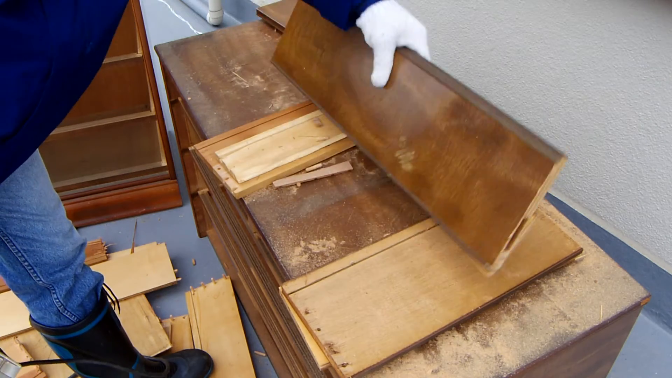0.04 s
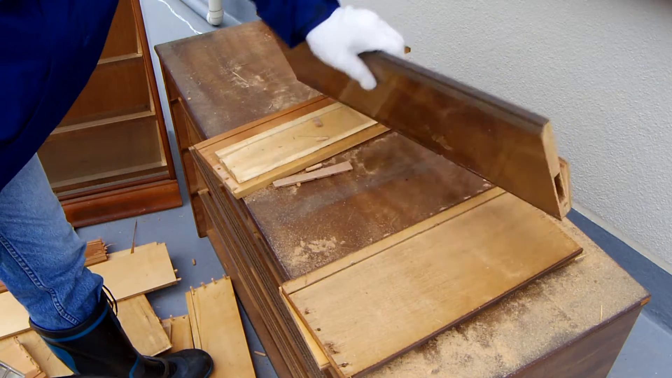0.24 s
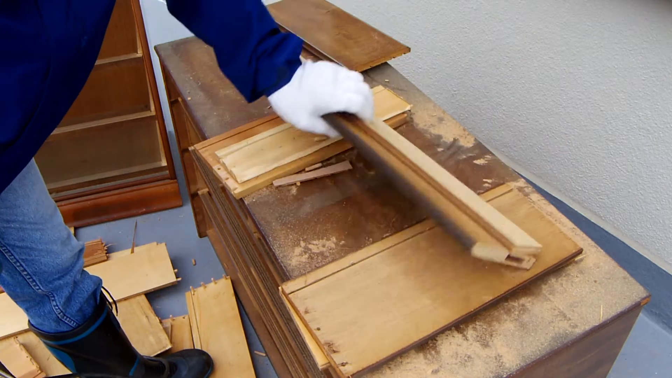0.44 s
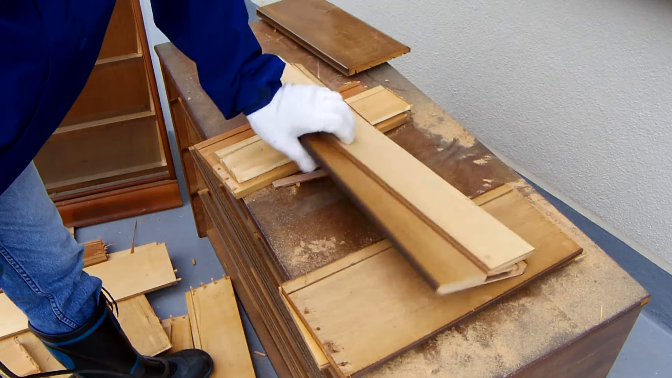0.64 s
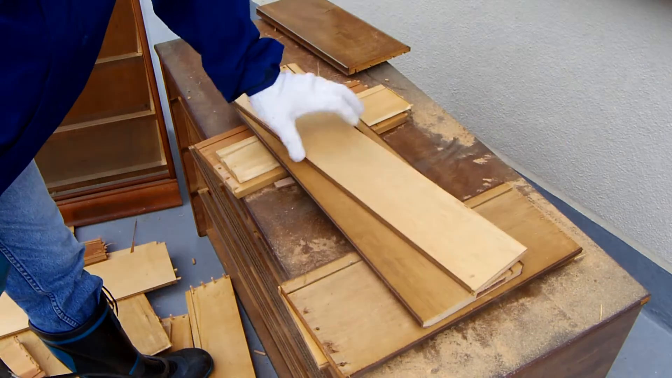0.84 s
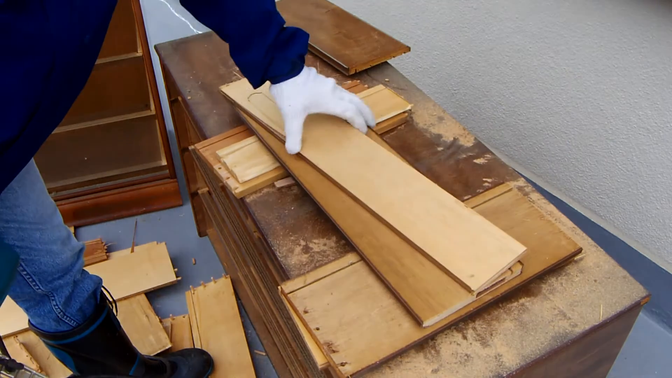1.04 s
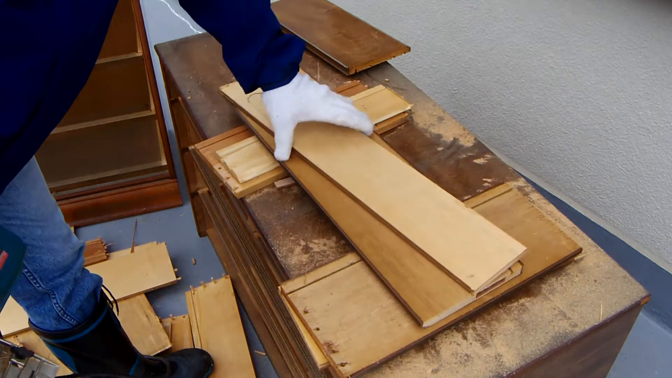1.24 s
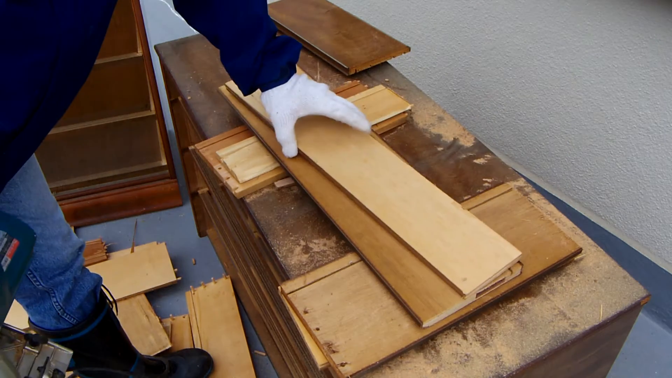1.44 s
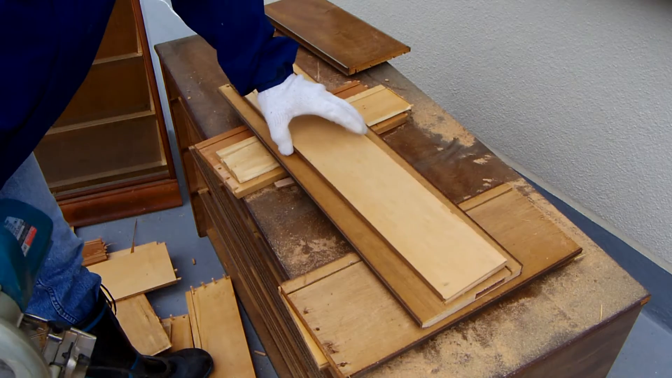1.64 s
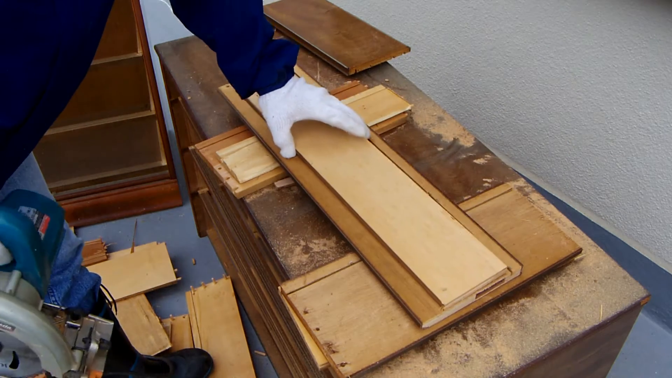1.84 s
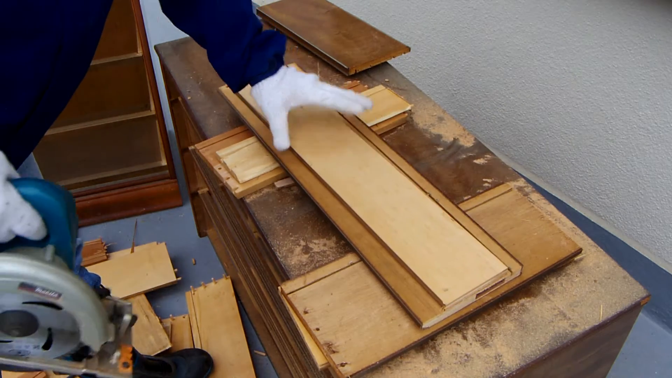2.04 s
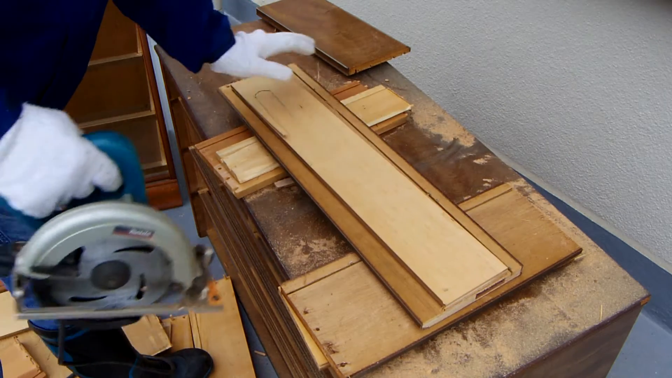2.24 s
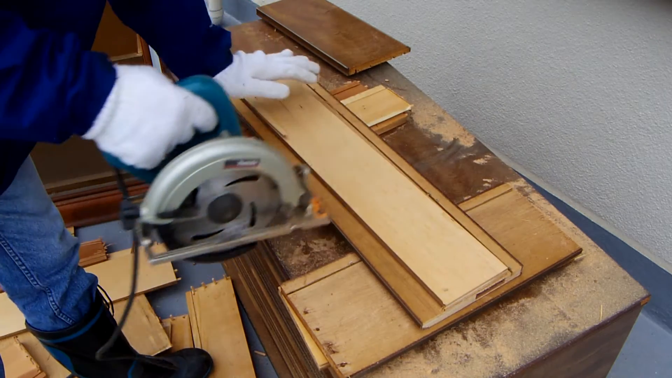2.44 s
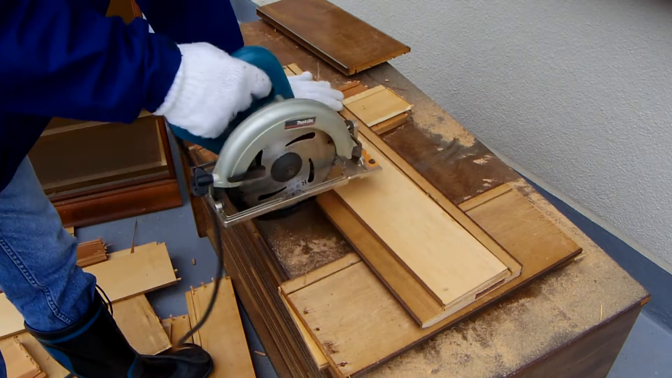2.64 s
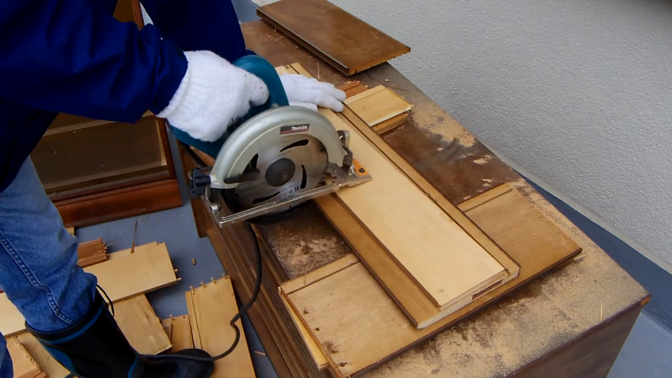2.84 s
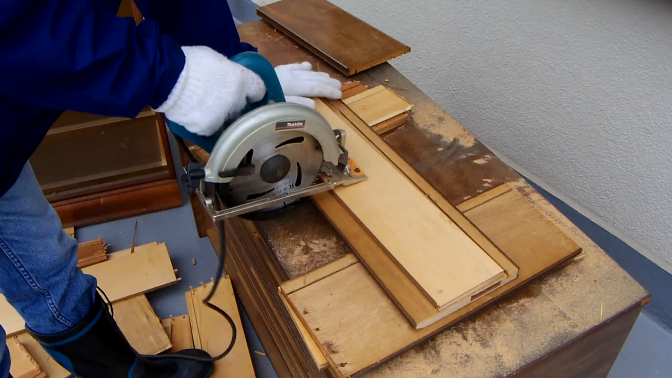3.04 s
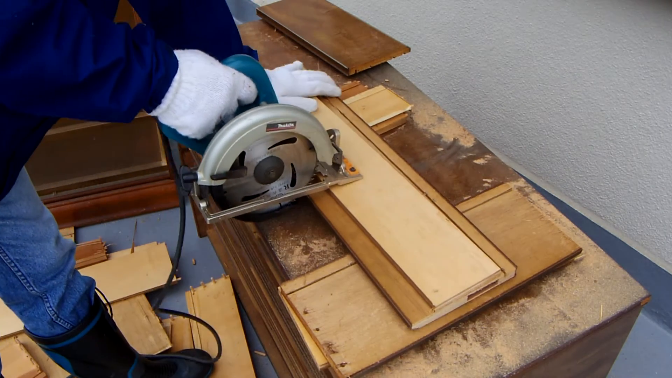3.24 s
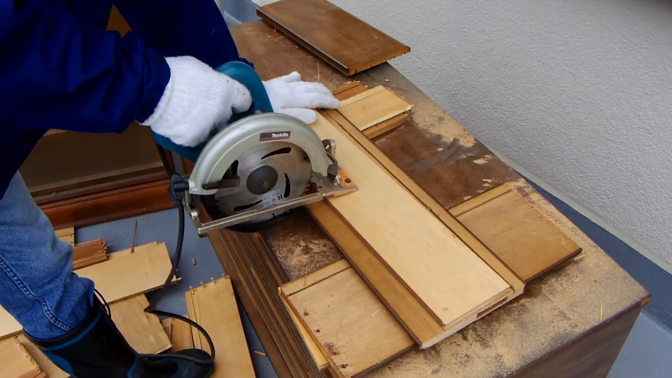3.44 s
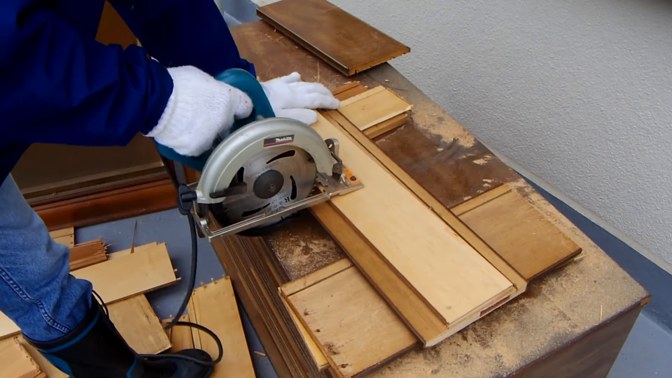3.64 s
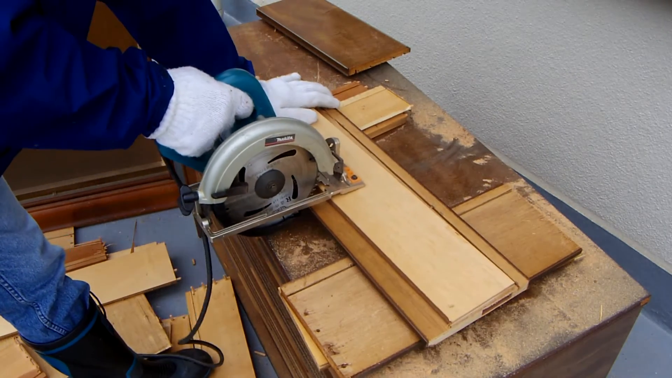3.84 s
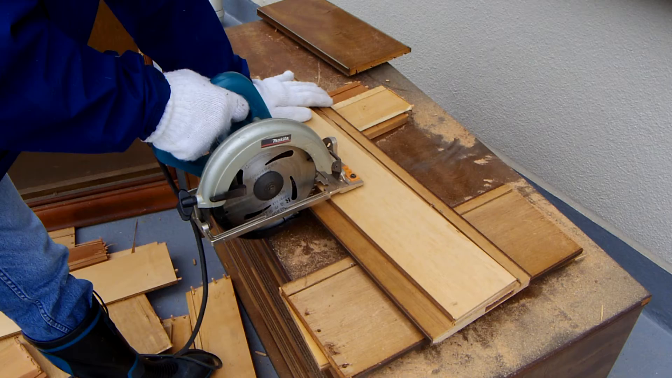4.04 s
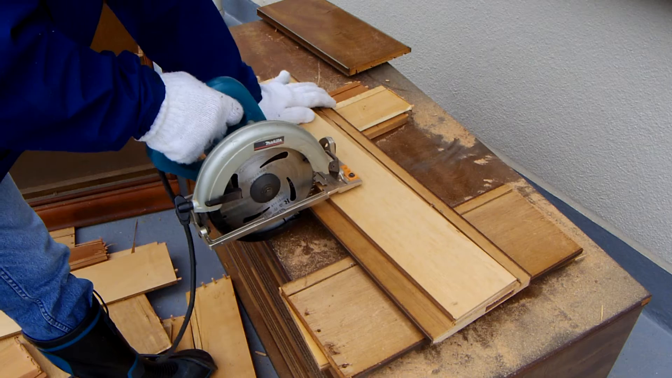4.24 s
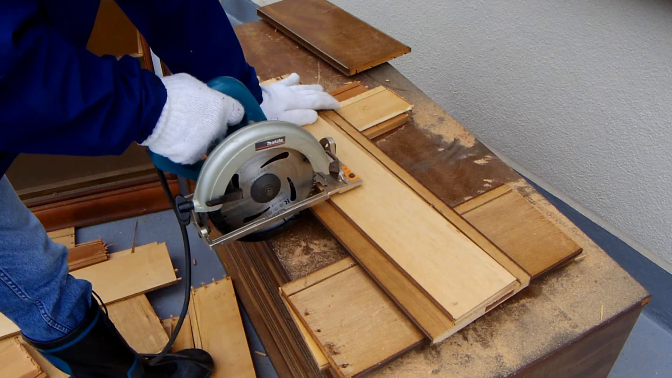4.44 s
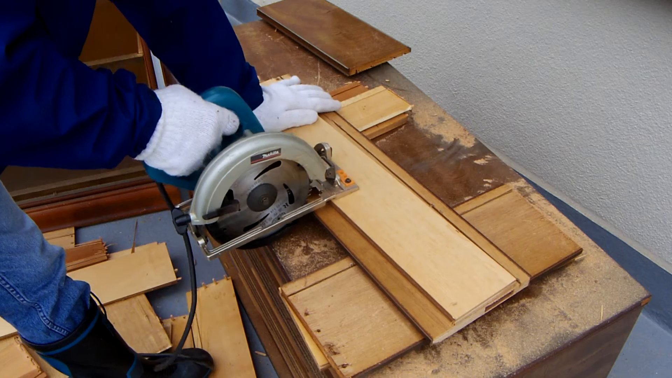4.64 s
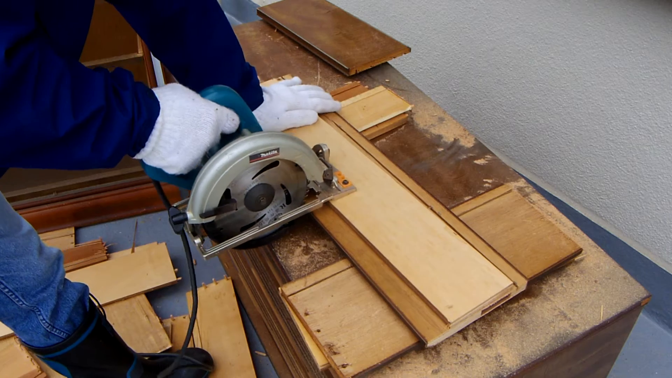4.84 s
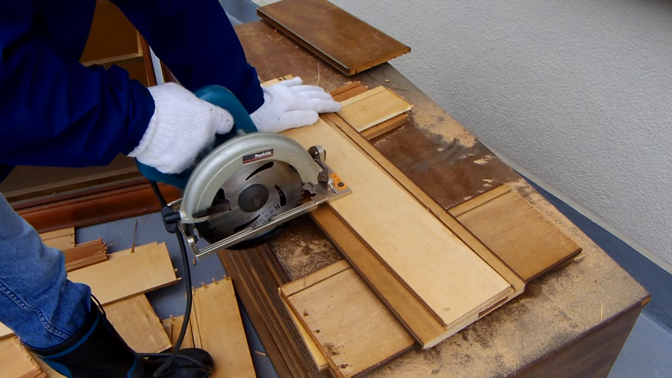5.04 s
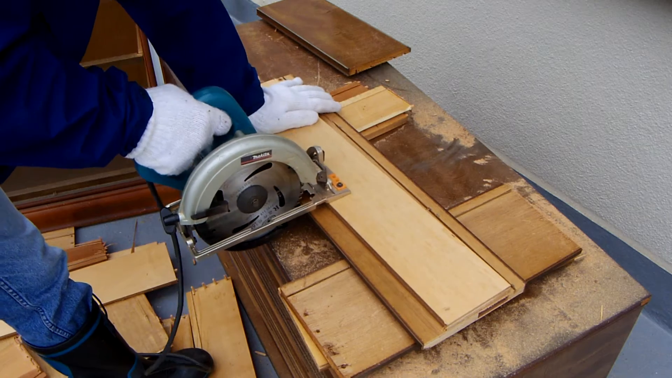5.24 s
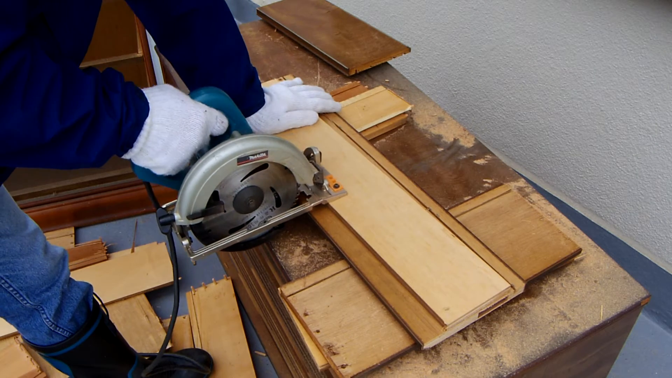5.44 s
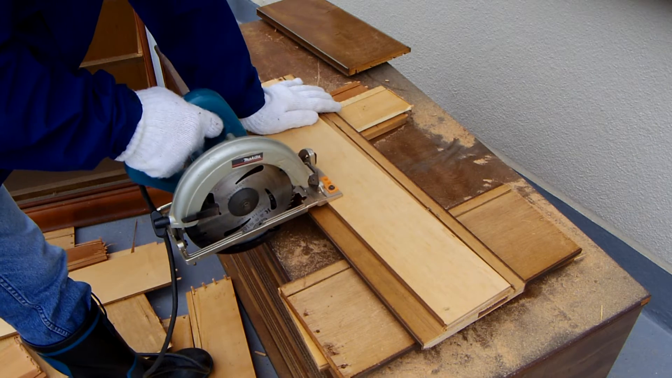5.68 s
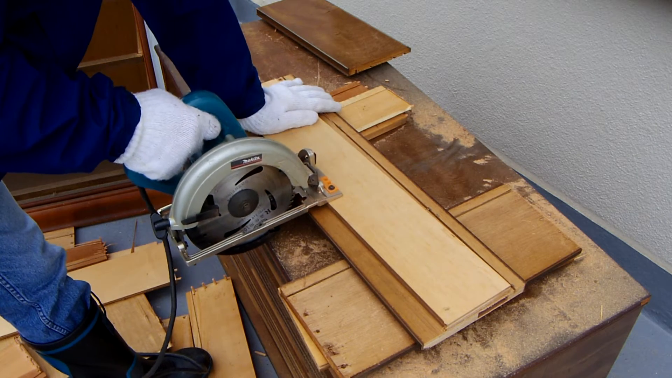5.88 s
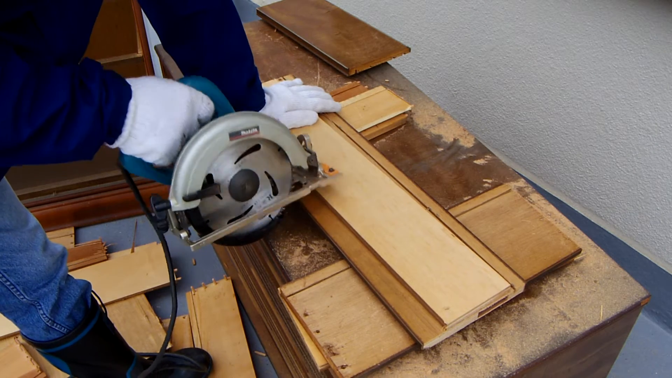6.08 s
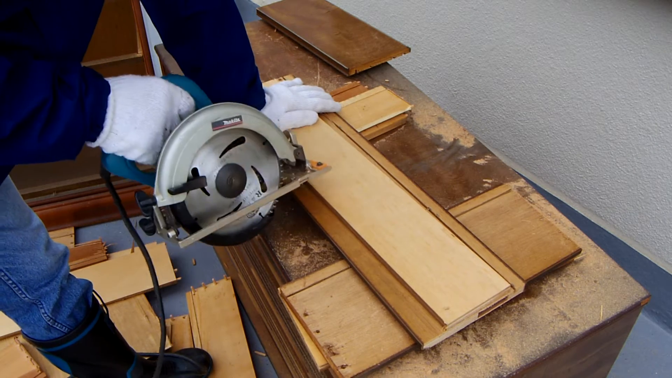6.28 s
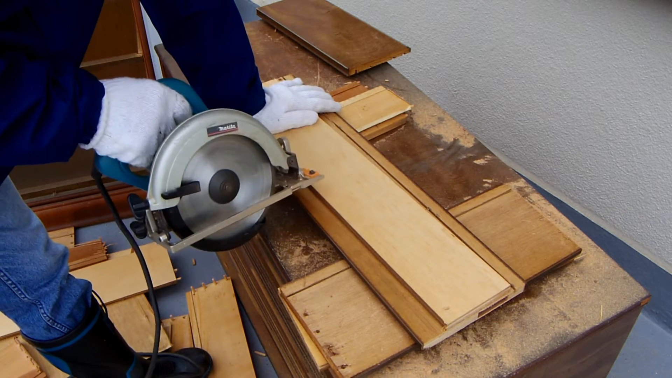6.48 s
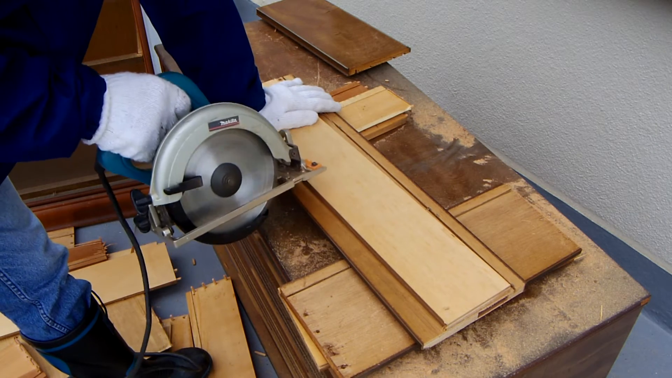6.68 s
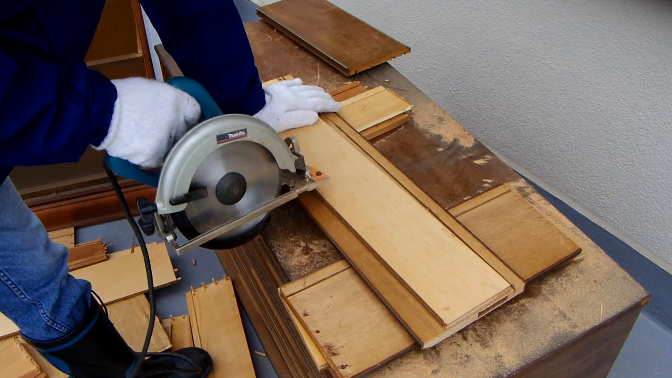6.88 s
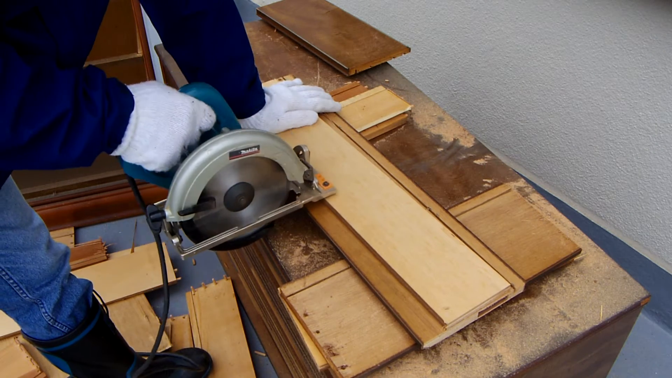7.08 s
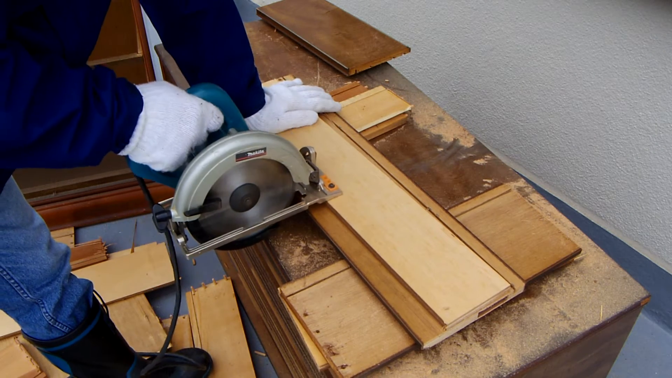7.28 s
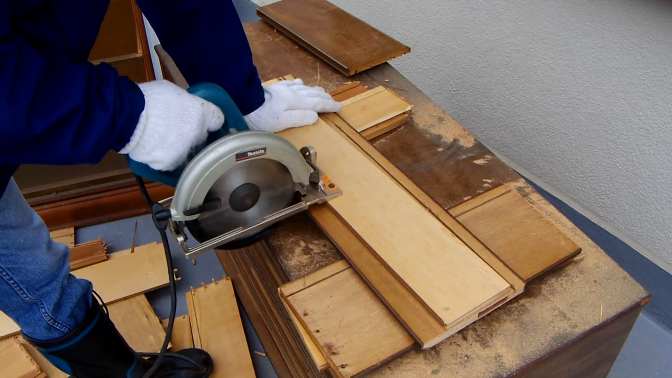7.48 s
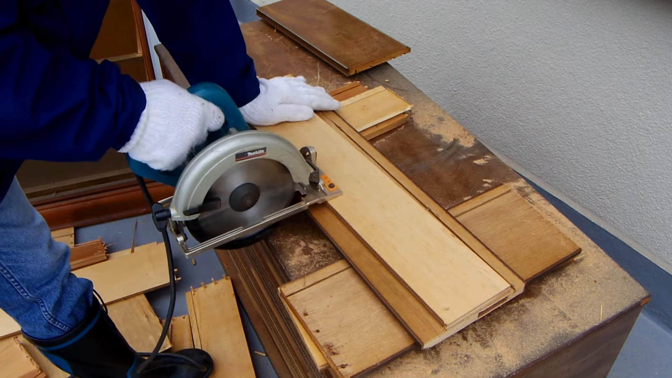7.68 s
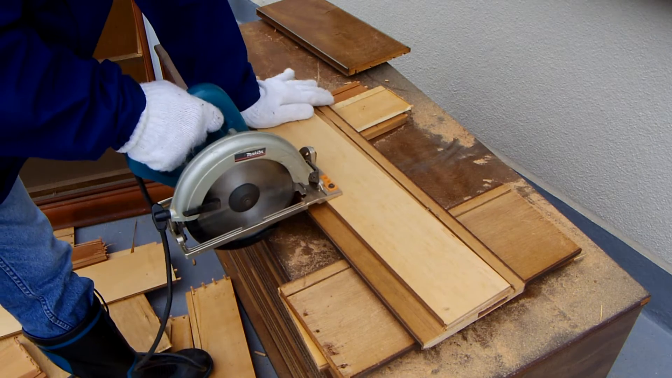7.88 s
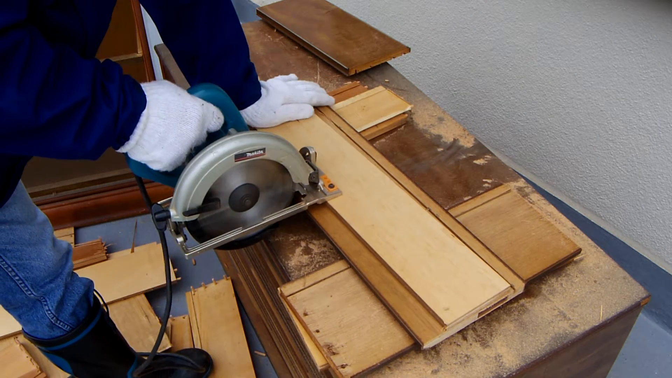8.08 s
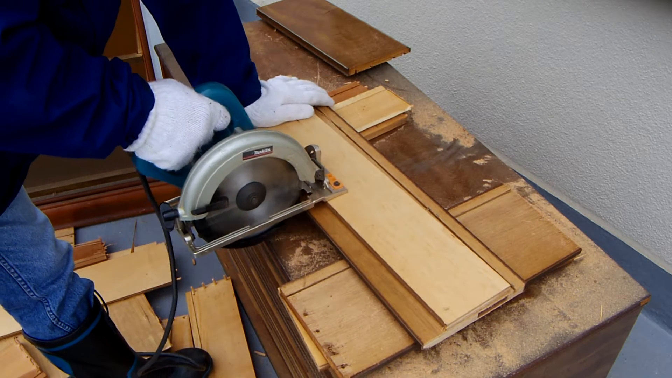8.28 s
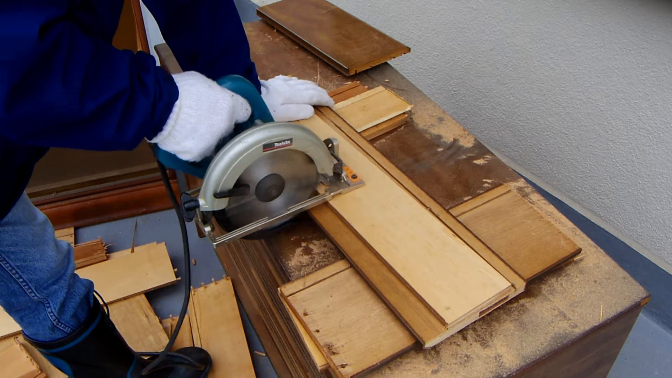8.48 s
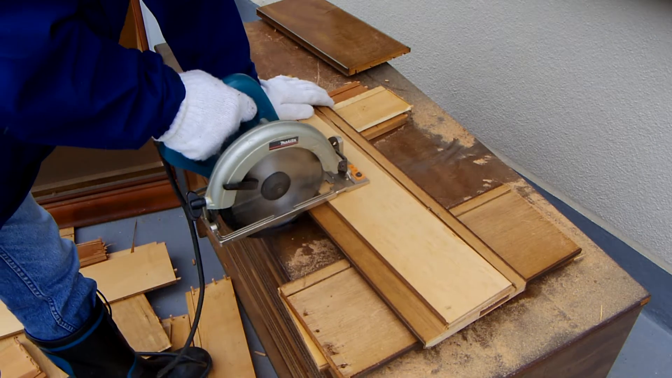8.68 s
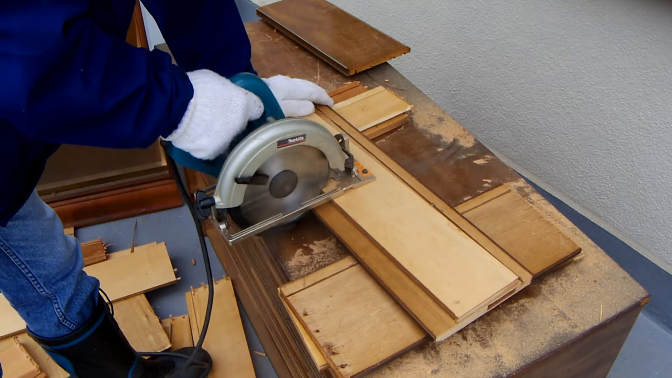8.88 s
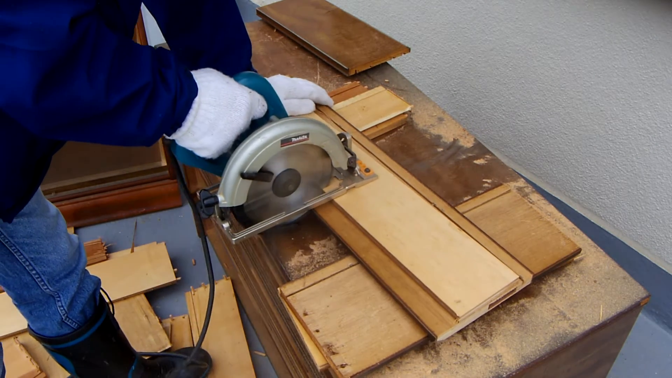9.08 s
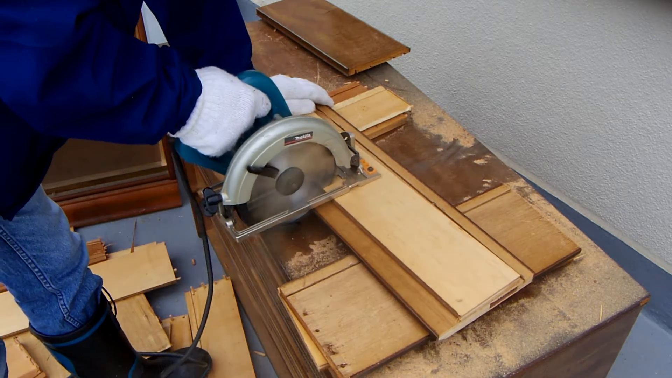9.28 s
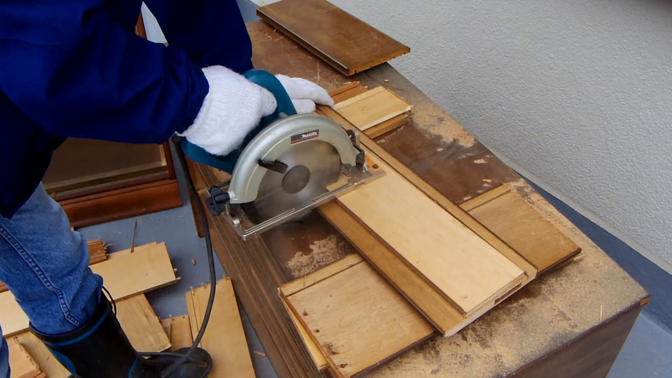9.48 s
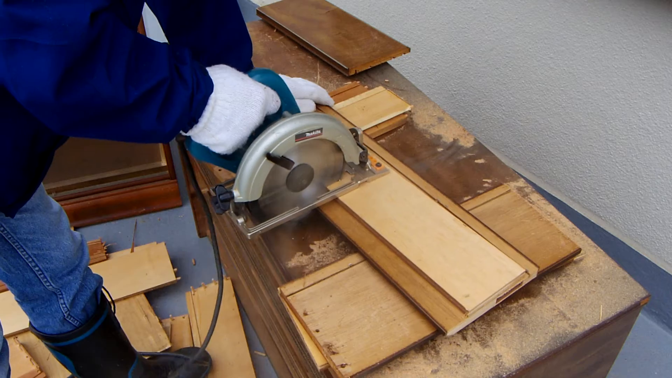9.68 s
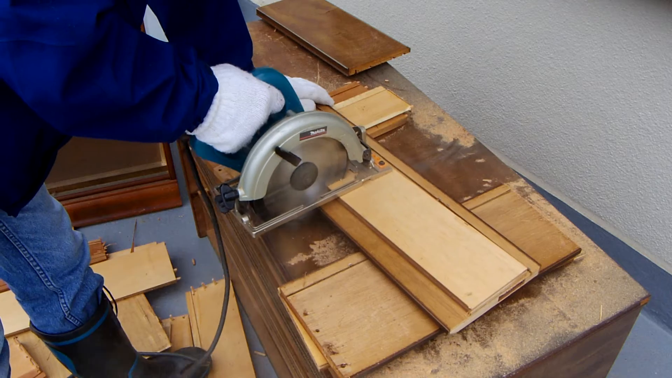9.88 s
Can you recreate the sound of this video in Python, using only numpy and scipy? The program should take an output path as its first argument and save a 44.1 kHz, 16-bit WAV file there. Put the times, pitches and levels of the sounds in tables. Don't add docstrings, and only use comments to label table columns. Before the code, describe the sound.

Close stereo pickup among near walls, with short bright echoes. Faint town hush and a distant low engine throb lie underneath, the engine slowing until about 3 s, then pulling away. A board is handled with light taps, strikes on edge at 0.57 s with small bounces, then slaps flat loudly at 0.9 s and settles. Soft rustles and tiny metal ticks follow. At 2.95 s a saw lands on the bench with a modest thud and rocks; metal taps, slides, a nudge at 3.6 s and guard chatter until 4.3 s. A lever snaps sharply at 4.36 s, clicking back softer at 4.75 s. Near quiet until 6.5 s, when the motor blips, squeals under braking, then from 6.8 s climbs quickly into an airy whining rush. At 8.55 s teeth bite: loud harsh tearing, growl and bright splinter cracks, pitch sagging as the cut labours on to the end, around 9.9 s.

```python
import sys
import numpy as np
from scipy import signal
from scipy.fft import rfft, irfft
from scipy.io import wavfile
from scipy.ndimage import uniform_filter1d

SR = 44100
rng = np.random.default_rng(int(sys.argv[2]) if len(sys.argv) > 2 else 0)


def level_to_linear(level):
    exponent = np.asarray(level, float) / 20
    return 10 ** exponent


def generate_wav(sig):
    pcm = np.round(np.clip(np.atleast_2d(sig).T, -1, 1) * 32767).astype(np.int16)
    wavfile.write(sys.argv[1], SR, pcm)


N = 437472
T = np.arange(N) / SR
GEAR, TEETH = 4, 60


def level(x, db, where=slice(None)):
    return x * level_to_linear(db) / np.sqrt(np.mean(x[..., where] ** 2))


def colour(x, points):
    hz, db = np.transpose(points)
    f = np.fft.rfftfreq(x.shape[-1], 1 / SR) + 1
    gain = level_to_linear(np.interp(np.log(f), np.log(hz), db))
    return irfft(rfft(x) * gain, x.shape[-1])


def band(x, lo_hz, hi_hz, order=2):
    return signal.sosfilt(signal.butter(order, [lo_hz, hi_hz], "band", fs=SR, output="sos"), x)


def ring(x, peaks):
    return sum(level_to_linear(db) * band(x, hz - width / 2, hz + width / 2, order=1) for hz, width, db in peaks)


def curves(table):
    s, *columns = np.transpose(table)
    return [np.interp(T, s, c) for c in columns]


def walk(rate):
    k = int(SR / rate)
    return 1.07 * uniform_filter1d(np.repeat(rng.standard_normal(N // k + 1), k), k)[:N]


def pulses(cycles, size):
    sample = np.arange(N - 1.).tolist() + [N - 2.]
    at = np.interp(np.arange(1, int(cycles[-1])), cycles, sample)
    i, part = at.astype(int), at % 1
    size = size[:len(i)]
    return np.bincount(i, size * (1 - part), N) + np.bincount(i + 1, size * part, N)


def noise():
    return rng.standard_normal(N)


# frequency in Hz, level in dB per Hz.
AIR_SPECTRUM = [(15, -33), (30, -1.5), (70, -13), (130, -19), (229, -13), (476, -20.5), (936, -21.5),
                (1040, -24), (2610, -34), (7310, -48.5), (12500, -49.5), (16000, -66)]
# time in seconds, level in dB.
AIR_SWELL = [
    (0.0, -65),
    (2.83, -75.5),
    (3.47, -66.5),
    (4.78, -70.5),
    (4.95, -68.5),
    (6.4, -70),
]


def air():
    mid = colour(noise(), AIR_SPECTRUM)
    side = colour(colour(noise(), AIR_SPECTRUM), [(200, -16.5), (4000, 4)])
    swell_db = curves(AIR_SWELL)[0] - np.interp(2.2, *np.transpose(AIR_SWELL))
    gain = level_to_linear(-67 + swell_db + 1.25 * walk(1.112)) / band(mid, 250, 16000).std()
    return (mid + side * np.array([[1], [-1]])) * gain


# time in seconds, firing rate in Hz, loudness in dB.
ENGINE_SPEED = [(0.0, 40.45, -0.5), (0.38, 39.21, -0.5), (1.05, 33.12, 1), (1.98, 29.29, -1.5),
                (2.51, 22.83, 0), (2.98, 21.05, 1), (3.42, 29.56, 3.5), (4.11, 29.42, -0.5),
                (4.4, 32.51, 0), (4.68, 32.83, 0.5), (5.57, 38.45, 0.5), (6.26, 41.52, -1),
                (6.59, 37.93, 0.5), (6.89, 38.52, -4.5), (7.63, 43.15, 3.5), (8.4, 47.5, 4),
                (9.12, 43.3, 3.5), (9.92, 43.9, 4)]
# start in seconds, level in dB of multiples 1, 2, 4 and 6 of the firing rate, unsteadiness in radians.
DRIVING = [
    (0, -82.5, -51.5, -51.5, -74, 0.53),
    (1.2, -66, -64, -56.5, -73.5, 2.1),
    (2.2, -68, -62, -65, -70.5, 1.62),
    (3.25, -58.5, -53.5, -65, -58.5, 0.39),
    (4.6, -50.5, -63.5, -62.5, -65, 0.49),
    (7.1, -50.5, -69, -60.5, -87, 0.45),
    (7.7, -56, -75, -75, -71, 0.89),
]
# multiple of the firing rate, level in dB (3 and 5 relative to the mean of their #
EXHAUST = [(3, -5), (5, 0), (7, -0.5), (8, 2), (9, -4.5), (10, -7.5), (11, -7.5), (12, -8.5), (13, -12.5)]
# frequency in Hz, gain in dB.
EXHAUST_COLOUR = [(30, 1), (120, 0.5), (160, 3.5), (210, 3.5), (260, -2.5), (330, -4), (430, 2.5), (600, 3)]


def engine():
    hz, loud_db = curves(ENGINE_SPEED)
    phase = np.searchsorted([row[0] for row in DRIVING[1:]], T)
    change_s = 0.43
    driving = np.array(DRIVING, float)[phase, 1:].T
    *levels_db, unsteady = uniform_filter1d(driving, int(change_s * SR), axis=1)
    first_db, second_db, fourth_db, sixth_db = loud_db + np.array(levels_db)
    cycles = np.cumsum(hz * (1 + 0.00566 * walk(25))) / SR
    lines = {1: first_db, 2: second_db, 4: fourth_db, 6: sixth_db}
    for k, under_db in EXHAUST:
        if k < 6:
            lines[k] = under_db + (lines[k - 1] + lines[k + 1]) / 2
        else:
            lines[k] = under_db + sixth_db
    throb = 0
    for k, db in lines.items():
        wander_db = (1.5 if k < 2 else 2.6) * walk(4.4)
        waver = unsteady * (0.73 + 0.12 * k) * walk(9)
        throb = throb + level_to_linear(-1.5 + db + wander_db) * np.sin(2 * np.pi * k * cycles - 1.206 * k + waver)
    gas = np.exp(-(cycles % 1) / 0.3) * band(noise(), 470, 5500, order=1)
    road = unsteady ** 2 * level(band(noise(), 34.9, 92), -67.5)
    return colour(throb, EXHAUST_COLOUR) + level_to_linear(sixth_db) * level(gas, -20) + road


# middle in seconds, length in seconds, level in dB.
STROKES = [
    (0.177, 0.049, -73),
    (0.45, 0.22, -82),
    (1.5, 0.28, -79),
    (2.703, 0.72, -80),
    (3.549, 0.045, -62),
    (3.828, 0.03, -62),
    (4.093, 0.15, -65.5),
    (5.04, 0.062, -71),
    (5.696, 0.059, -83),
    (6.303, 0.087, -83),
]
# frequency in Hz, level in dB per Hz.
RUSTLE_COLOUR = [(800, 2), (2500, 3.5), (3900, -5), (4500, 0.5), (5200, -1), (8000, 0), (11500, -3),
                 (16000, -5)]


def rustle():
    grains = noise() * level_to_linear(3.1 * rng.exponential(size=N) + 2.8 * walk(70))
    strokes = level_to_linear(-77.5) + sum(level_to_linear(db) * np.exp(-((T - s) / length) ** 2) for s, length, db in STROKES)
    return strokes * level(colour(grains, RUSTLE_COLOUR), -3.3)


WOOD_BANDS_HZ = [(105, 147), (300, 1420), (1100, 3140), (2700, 7900), (7000, 12100)]
METAL_BANDS_HZ = [(1000, 7300), (5500, 12900)]


def knocks(table, modes, bands_hz, shares, lasting, ring_s, push_s, crack_s, hiss_db, detune):
    out, t = np.zeros((2, N)), T[:8192]
    hz, db, t60 = np.transpose(modes)[:, :, None]
    for s, peak_db, hard_db in table:
        chance = rng.standard_normal((3, len(hz), 1))
        hiss = rng.standard_normal(len(t))
        fade = level_to_linear(db + 2.2 * chance[0] - 60 * t / np.minimum(t60, 1.5 * ring_s))
        tones = fade * np.sin(2 * np.pi * hz * (1 + detune * chance[1]) * t + 3 * chance[2])
        tones = tones.sum(axis=0)
        blow = 0
        for (lo, hi), share, life in zip(bands_hz, shares, lasting):
            tail = level_to_linear(hiss_db - 60 * t / crack_s)
            tail = tail + level_to_linear(hiss_db - 5.5 - 60 * t / (life * ring_s))
            tail = tail + level_to_linear(hiss_db - 22.5 - 60 * t / (2.7 * life * ring_s))
            push = 1 - np.exp(-t / (push_s * life ** 2))
            part = band((tones + hiss * tail) * push, lo, hi)
            blow = blow + level_to_linear(peak_db + share * hard_db) * part / np.abs(part).max()
        i = int(s * SR)
        out[:, i:i + len(t)] += blow
    return out


# start in seconds, peak in dB, hardness in dB (top band over main band).
BOARD_KNOCKS = [
    (0.0995, -43.5, 8.5),
    (0.386, -40.5, -2),
    (0.475, -37.5, -3),
    (0.496, -36, -2.5),
    (0.512, -58, 8.5),
    (0.5745, -17.5, 0.5),
    (0.579, -17.5, 0.5),
    (0.641, -25, -30),
    (0.6645, -29.5, -33),
    (0.689, -48.5, -18),
]
# frequency in Hz, level in dB, t60 in seconds.
BOARD_MODES = [(126.8, 1.5, .12), (244, -29, .1), (358, -19, 0.1), (394, -7, 0.13), (487, 0.5, 0.24),
               (580, 3.5, 0.2), (620, 8, 0.027), (810, 4, 0.12), (979, 2, 0.18), (1143, -3, 0.18),
               (1510, 3, 0.094), (1770, -3, 0.045), (2000, 9, 0.017), (2250, -15, 0.044)]


def board_knocks():
    return knocks(BOARD_KNOCKS, BOARD_MODES, WOOD_BANDS_HZ, shares=(0.069, 0.2, 0.65, 1.65, 1.6),
                  lasting=(4.0, 1.3, 0.55, 0.34, 0.17), ring_s=0.057, push_s=0.00034, crack_s=0.0035,
                  hiss_db=20.0, detune=0.019)


# start in seconds, peak in dB, hardness in dB.
SHOE_TAPS = [(0.171, -49, -10), (0.401, -45, -7), (0.4344, -59, 0), (0.605, -52, 1), (0.6244, -54, 10),
             (1.0424, -63, 11), (1.3123, -52, -6), (1.436, -57, -2), (1.6494, -54.5, -16),
             (2.1414, -60, -9.5), (2.5486, -60, -20.5), (3.1661, -40.5, -8), (3.2066, -53.5, -17),
             (3.2869, -57, -5), (3.3212, -45.5, -7), (3.3501, -53, -14), (3.4306, -53, -8),
             (3.5424, -47, -4), (3.555, -54, -4), (3.701, -60, -10), (3.7447, -42.5, -25),
             (3.7594, -43.5, -23), (3.772, -54, -14), (4.8224, -44.5, -5), (4.8756, -52, -11),
             (6.5011, -41, -17)]
# frequency in Hz, level in dB, t60 in seconds.
SHOE_MODES = [(1650, 6.5, 0.037), (1970, 0, .04), (2660, 3.5, 0.032), (3510, 2.5, 0.026), (4340, -3, 0.018),
              (5740, -8, .02), (7250, -2, .02), (10700, -1, .015)]


def shoe_taps():
    return knocks(SHOE_TAPS, SHOE_MODES, METAL_BANDS_HZ, shares=(0, 1), lasting=(1.1, .7),
                  ring_s=0.042, push_s=0.00026, crack_s=0.016, hiss_db=6.0, detune=0.024)


# start in seconds, peak in dB, hardness in dB.
FLAT_SLAPS = [
    (0.891, -25.5, -3.5),
    (0.8965, -13, -4),
    (0.957, -28, 3.5),
    (0.986, -20.5, -2),
    (1.019, -36, -26),
]
# frequency in Hz, level in dB, t60 in seconds.
FLAT_MODES = [(127, -8, .12), (320, -10.5, .1), (493, -4.5, .1), (831, -2, .071), (1263, 0.5, .08),
              (1670, -2, .05), (1990, 4.5, 0.032), (2800, -26, 0.03), (3700, -3.5, 0.033),
              (5450, -17, 0.033), (6300, -10.5, .027)]


def flat_slaps():
    return knocks(FLAT_SLAPS, FLAT_MODES, WOOD_BANDS_HZ, shares=(0.87, 0.23, 0.19, 0.86, 2.0),
                  lasting=(4.7, 2.05, 0.88, 0.44, 0.3), ring_s=0.033, push_s=0.00041, crack_s=0.00065,
                  hiss_db=18.5, detune=0.032)


# start in seconds, peak in dB, hardness in dB.
SEATING = [
    (2.946, -29, 6.5),
    (2.956, -31, -22),
    (2.978, -40, -20),
    (3.045, -46, -20),
    (3.021, -39.5, -9),
    (3.029, -37, -14),
    (3.1467, -45.5, 1),
]
# frequency in Hz, level in dB, t60 in seconds.
BENCH_MODES = [(131, -1, .12), (221, -12, .1), (586, 0.5, .087), (1020, 12, 0.022), (1800, -16, .04),
               (2230, -13, 0.046), (2580, -7, .06), (3140, -14, .06), (3840, 13, 0.018), (4440, -16, 0.03)]


def saw_seating():
    return knocks(SEATING, BENCH_MODES, WOOD_BANDS_HZ, shares=(0, 0.14, 0.67, 0.77, 1.3),
                  lasting=(6.3, 1.9, 0.98, 0.67, 0.4), ring_s=0.034, push_s=0.00028, crack_s=0.003,
                  hiss_db=17.0, detune=0.006)


# start in seconds, peak in dB, hardness in dB.
NUDGES = [
    (3.591, -46, 3.1),
    (3.609, -32, 7.3),
]
# frequency in Hz, level in dB, t60 in seconds.
EDGE_MODES = [(126, 15, .12), (368, 7, .082), (565, -1, .07), (750, 5, .07), (1070, -4.5, .06),
              (1950, -6, .04), (2770, 3.5, 0.031), (4120, -5, 0.023), (6800, 2, 0.025)]


def edge_nudges():
    return knocks(NUDGES, EDGE_MODES, WOOD_BANDS_HZ, shares=(1.1, 0, .3, 1.2, .9),
                  lasting=(3.5, 2.8, 0.87, 0.43, 0.52), ring_s=0.04, push_s=0.00095, crack_s=0.0042,
                  hiss_db=7.5, detune=0.007)


# start in seconds, peak in dB, hardness
# in dB.
ENGINE_TICKS = [(3.7973, -57, -4), (3.8696, -57, 1), (3.9056, -54, 2), (3.9375, -57, 5), (3.9704, -57, 0),
                (4.0033, -57, -4), (4.0383, -55, -6), (4.072, -53, -2), (4.105, -56, -4), (4.1405, -55, 3),
                (4.1745, -58, 3), (4.1999, -58, 3), (4.2393, -58, 2), (4.2707, -55, 2), (4.9661, -58, -6),
                (5.044, -62, -8)]
# frequency in Hz, level in dB, t60 in seconds.
TICK_MODES = [(3800, -2, 0.022), (4440, 0.5, .03), (5320, -2, .02), (7360, 1, .02), (11400, -6, 0.016)]


def engine_ticks():
    return knocks(ENGINE_TICKS, TICK_MODES, [(3000, 6600), (6000, 12000)], shares=(0, 1), lasting=(1.1, .8),
                  ring_s=0.022, push_s=0.0003, crack_s=0.005, hiss_db=1.0, detune=0.026)


# start in seconds, peak in dB, hardness in dB.
LATCH = [
    (4.36, -24.5, 6.4),
    (4.7554, -36, 3.1),
]
# frequency in Hz, level in dB, t60 in seconds.
LEVER_MODES = [(1540, -7.5, .05), (2860, 6, .06), (4490, 15, .05), (6200, 3.5, .044), (7860, 5, 0.02),
               (9500, -16, 0.026), (10600, -13, .03), (13430, -12, .03)]


def lever_latch():
    return knocks(LATCH, LEVER_MODES, METAL_BANDS_HZ, shares=(0, 1), lasting=(1.1, .75),
                  ring_s=0.018, push_s=0.0001, crack_s=0.0024, hiss_db=16.5, detune=0.019)


# time in seconds, armature speed in turns a second.
BLIP = [
    (6.49, 30),
    (6.6, 97),
    (6.655, 108),
    (6.68, 165),
    (6.72, 130),
    (6.8, 62),
]
# time in seconds, armature speed in turns a second.
LOADED = [
    (8.55, 286.5),
    (8.65, 273.5),
    (8.9, 257),
    (9.15, 234.5),
    (9.4, 227),
    (9.5, 215),
    (9.65, 212),
    (9.92, 211.6),
]


def armature():
    since = np.maximum(T - BLIP[-1][0], 0)
    run_up = 291.7 - 139.7 * np.exp(-since / .142) - 89.7 * np.exp(-since / .598)
    running = np.where(T < LOADED[0][0], run_up, curves(LOADED)[0])
    return np.where(T < BLIP[-1][0], curves(BLIP)[0], running)


# frequency in Hz, level in dB per Hz.
RUSH = [(120, -59), (200, -65), (277, -4.5), (391, -18), (561, -9), (637, -15.5), (835, -7), (1270, -11),
        (2030, -2.5), (2910, -8), (3240, -6), (3680, -7), (4740, -11), (10700, -4), (15100, -13.5)]
# frequency in Hz, width in Hz, level in dB.
GUARD_MODES = [(6127, 94, 1.5), (8500, 92, -9), (10300, 170, -21), (12450, 540, -9)]
WHINE_MULTIPLES = 4, 8, 12, 16, 24, 44, 46, 47, 49, 50, 59, 60, 84, 93, 146, 156.6, 177, 181, 189, 193, 197
WHINE_DB = (-26, -23, -20, -24, -28, -24, -15, -13, -24, -24, -26,
            -21, -24, -24, -28, -14, -30, -27, -30, -30, -24)
STRAIN_SHARE = {46: .1, 47: .2, 59: 1.1, 60: 1.1, 189: .8, 193: .8, 197: .7, 156.6: -.6}
# multiple of the blade turn, width in Hz, level in dB.
VANES = [(128, 500, -23), (146, 600, -16), (194, 900, -15)]
# frequency in Hz, gain in dB.
HOUSING = [(200, 0), (900, -2), (1400, 0), (2000, 1), (2200, 3), (2420, -1), (2680, 3), (2930, -5),
           (3200, 3), (3450, 4), (3850, -8), (4250, 0), (4600, -4), (6000, 2), (7000, -4), (8500, 3),
           (9300, -1), (10200, 3), (11300, -7), (12700, 6), (13700, -6)]


def motor(turns, speed):
    start_s, held_s, brake_s, brake_length_s = BLIP[0][0], BLIP[-1][0], 6.695, .018
    octaves = np.log2(speed / speed.max())
    squeal_db = 12 * np.exp(-((T - brake_s) / brake_length_s) ** 2)
    coasting = np.interp(T, (brake_s, brake_s + .03, held_s, held_s + .02), (0, 1, 1, 0))
    powered = -0.99 - coasting - 2 * np.exp(-np.maximum(T - start_s, 0) / 0.033)
    effort = np.maximum(octaves, powered)
    rush_db = -34.5 + 8.5 * effort + 0.072 * squeal_db
    rush_db = rush_db + np.where(T < brake_s, 1, -3 * (T < held_s))
    whine_db = np.interp(octaves, (-1, 0), (0, 6)) - 9 * coasting
    whine_db = whine_db - 4 * (T < brake_s - brake_length_s)
    guard_db = np.interp(octaves, (-1, 0), (7, -2))
    strain_db = 10 * np.clip(-octaves / .3, 0, 1) * (T < LOADED[0][0])

    beat = 1 + 0.14 * np.sin(2 * np.pi * GEAR * turns)
    rush = level(colour(beat * noise() * level_to_linear(0.25 * walk(34)), RUSH), 0)
    rush = rush + (level_to_linear(18 * effort) - 1) * colour(rush, [(5000, -28), (9000, -7.0)])
    rush = rush + (level_to_linear(14 * octaves) - 1) * colour(rush, [(1000, -4.5), (1600, -44)])

    slack = np.clip(1.2 - speed / speed.max(), 0, .55)
    shudder = 0.00018 * walk(65)
    whine = 0
    for k, db in zip(WHINE_MULTIPLES, WHINE_DB):
        line_db = db + squeal_db * (55 < k < 100) + strain_db * STRAIN_SHARE.get(k, 0)
        patchy_db = 1.3 * walk(10) + 3.0 * slack * walk(45)
        phase = 2 * np.pi * k * (turns + shudder) + 1.5 * slack * walk(120)
        whine = whine + level_to_linear(line_db + patchy_db) * np.sin(phase)
    for k, width, db in VANES:
        whine = whine + level_to_linear(db + 0.00411 * k * strain_db) * walk(width) * np.sin(2 * np.pi * k * turns)
    guard = ring(noise() * level_to_linear(2.8 * walk(22)), GUARD_MODES) * level_to_linear(4.5 + guard_db)
    on = np.clip((T - start_s) / 0.016, 0, 1) ** 2
    return on * level_to_linear(rush_db) * (rush + 0.73 * level_to_linear(whine_db) * colour(whine, HOUSING) + guard)


# frequency in Hz, gain in dB.
BENCH_NOTCH = [(4350, 0), (4520, -5), (4620, -16), (4760, -4), (4950, -12), (5100, 0)]


def bench_echo(x):
    depth = np.clip(.8 + .3 * walk(12), 0, 1)
    return x + depth * (colour(x, BENCH_NOTCH) - x)


def growl(turns, strong, rest_db):
    named = {round(k): db for k, db in strong}
    out = 0
    for k in range(1, max(named) + 1):
        phase = 2 * np.pi * (k * turns + rng.random()) + 0.5 * walk(40)
        out = out + level_to_linear(named.get(k, rest_db) + 2.2 * walk(16)) * np.sin(phase)
    return level(out, 0)


# multiple of the blade turn, level in dB.
ENTRY_STRONG = [(8, 2), (11, -2), (12, -9), (14, -0.5), (16, 4), (17, -3.5), (19, -5), (24, 4)]
# multiple of the blade turn, level in dB.
DEEP_STRONG = [(3, -8), (6, -8.5), (8, -7.5), (10, -7), (12, -4.5), (14, -1.5), (16, -4.5), (17, -3),
               (18, -2.5), (19, -15), (20, -5.5), (23, -7.5), (28, -5), (30, 0)]


def board_growl(turns):
    deep = np.interp(T, (9.35, 9.55), (0, 1))
    return (1 - deep) * growl(turns, ENTRY_STRONG, -7.5) + deep * growl(turns, DEEP_STRONG, -15.5)


# time in seconds, level in dB.
FEED = [(8.545, -29.5), (8.555, -19.5), (8.575, -18), (8.62, -20), (8.68, -17.5), (8.785, -18),
        (8.847, -20), (8.93, -18), (9.003, -18), (9.08, -20.5), (9.157, -21.5), (9.3, -22.5), (9.4, -22),
        (9.573, -22), (9.7, -23), (9.85, -24), (9.92, -23)]
# time in seconds, level in dB over the tearing.
BITE = [
    (8.55, 4.5),
    (8.74, 3),
    (8.82, -1),
    (9.0, -1),
    (9.15, -3.5),
    (9.32, 1),
    (9.44, 0),
    (9.54, 7),
    (9.64, 1),
]
# frequency in Hz, level in dB per Hz.
CHIPS = [(180, -49), (300, -29), (467, -35), (681, -23), (871, -12.5), (1400, -21.5), (1910, -7),
         (2250, -6), (3940, -1.5), (4560, -4.5), (5460, -1), (8230, -4), (10000, 0), (13000, -1),
         (15100, -1.5)]
# frequency in Hz, width in Hz, level in dB.
BLADE_MODES = [(4000, 110, -1), (5170, 41, -3), (5600, 68, 2.5), (6700, 62, -3), (7010, 270, -0.5),
               (8720, 100, -5), (9840, 170, -12.5), (10400, 190, -6), (11000, 170, 2), (12000, 430, -0.5),
               (13050, 200, 7)]


def cut(turns):
    entry_s = FEED[0][0]
    level_db, song_db = curves(FEED)[0], curves(BITE)[0]
    since = np.maximum(T - entry_s, 0)
    biting = slice(int(entry_s * SR), N)
    count = int(turns[-1] * TEETH) + 9
    height = np.resize(rng.standard_normal(TEETH), count)
    size = 1 + 0.79 * height + 1.1 * rng.standard_normal(count)
    flutter = .05 * (walk(60) + walk(250))
    strikes = pulses(np.maximum.accumulate(turns * TEETH + flutter), size) * level_to_linear(2.5 * walk(30))
    wobble = 1 + 0.045 * np.sin(2 * np.pi * turns) + .2 * np.sin(2 * np.pi * GEAR * turns)
    snaps = noise() * level_to_linear(0.84 * np.minimum(rng.exponential(size=N), 6)) * level_to_linear(1.4 * walk(150))
    drive = level(strikes, -6.5, biting) * level_to_linear(song_db) + level(wobble * snaps, 0)
    tear = level(colour(drive, CHIPS), 0, biting)
    plate = sum(ring(drive * level_to_linear(3.2 * walk(14)), [mode]) for mode in BLADE_MODES)
    tear = tear + level(plate, -11.5, biting) * level_to_linear(1.5 * np.exp(-since / .08))
    tear = level(tear, 0, biting) + (level_to_linear(1 + since) - 1) * band(tear, 6200, 16400)
    entry = np.clip(since / 0.0062, 0, 1)
    return entry * (level_to_linear(level_db) * tear + level_to_linear(-43) * board_growl(turns))


# start in seconds, peak in dB.
SPLINTERS = [(8.7572, -1.5), (8.7782, -5), (8.8385, -4), (9.1307, -8.5), (9.2502, -3), (9.3014, -17),
             (9.3894, -16.5), (9.4243, -13), (9.495, -12), (9.59, -19), (9.629, -5), (9.7216, -12)]


def splinters():
    s, db = np.transpose(SPLINTERS)
    clicks = band(np.bincount((s * SR).astype(int), level_to_linear(db), N), 4700, 9700)
    return clicks * level_to_linear(db.max()) / np.abs(clicks).max()


# frequency in Hz, gain in dB.
WALL_COLOUR = [(100, 1.5), (1000, -1), (2500, 4), (8000, 12), (16000, 9.5)]


def walls(x):
    t, t60_s = T[:4096], .07
    wash = colour(rng.standard_normal((2, 2, len(t))), WALL_COLOUR) * level_to_linear(-60 * t / t60_s) * (t > .0015)
    wash = wash * level_to_linear(-3.5) / np.sqrt((wash ** 2).sum(axis=2, keepdims=True))
    sway = 2 * walk(4)
    out = x
    for part, w in zip((np.cos(sway), np.sin(sway)), wash):
        out = out + signal.oaconvolve(x * part, w, axes=1)[:, :N]
    return out


# frequency in Hz, gain in dB.
WOOD_COLOUR = [(100, -20), (170, -17.5), (300, 0.5), (500, 0.5), (2000, 1), (4000, 1), (8000, -5.5),
               (12000, -10), (16000, -12.5)]


def scene():
    speed = armature()
    turns = np.cumsum(speed) / GEAR / SR
    wood = board_knocks() + flat_slaps() + saw_seating() + edge_nudges()
    metal = shoe_taps() + engine_ticks() + lever_latch()
    saw = bench_echo(motor(turns, speed) + cut(turns) + splinters())
    near = rustle() + colour(wood, WOOD_COLOUR) + metal + saw
    return walls(near) * level_to_linear(1.0) + engine() * level_to_linear(np.array([[-1.6], [1.6]])) + air()


def roll_off(x):
    return signal.sosfilt(signal.butter(12, 17040, fs=SR, output="sos"), x)


def record(dry):
    f = np.fft.rfftfreq(N, 1 / SR)
    side = np.array([[.5], [-.5]])
    lag_s, top_hz = 1.6e-5, 15750
    balance_db = -0.3 + np.interp(f, (4000, 9000, 13000), (-1.3, -3.2, 2.2))
    ports = level_to_linear(side * balance_db) * np.exp(2j * np.pi * f * side * lag_s) / (1 + (f / top_hz) ** 200)
    return roll_off(np.tanh(irfft(rfft(dry) * ports, N)))


dry = scene()
out = record(dry)
generate_wav(out)
```